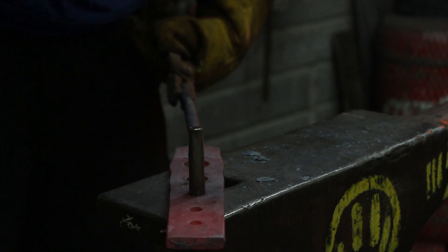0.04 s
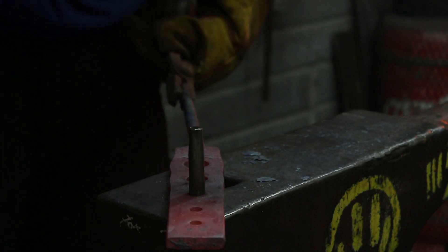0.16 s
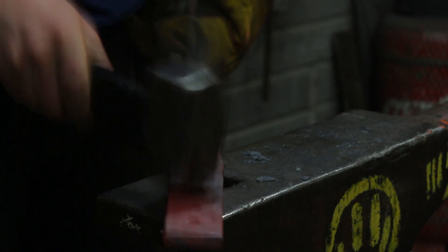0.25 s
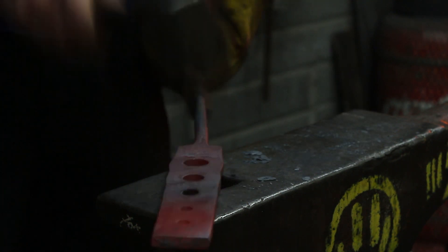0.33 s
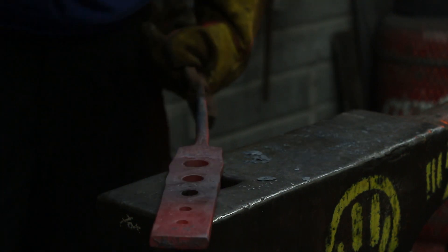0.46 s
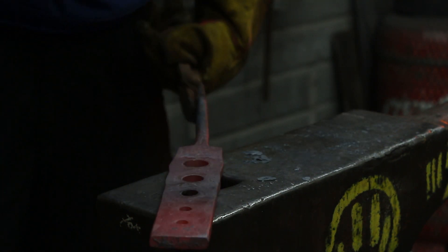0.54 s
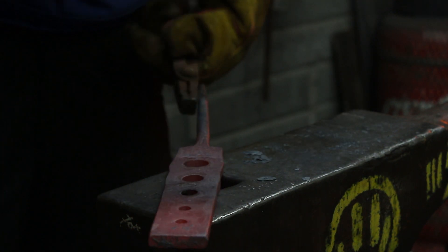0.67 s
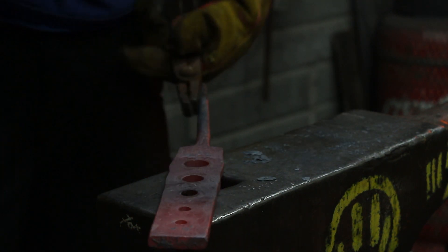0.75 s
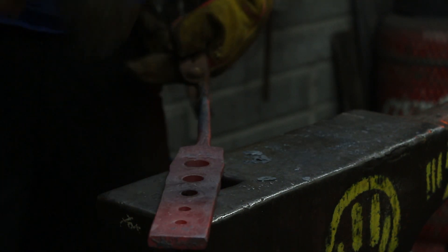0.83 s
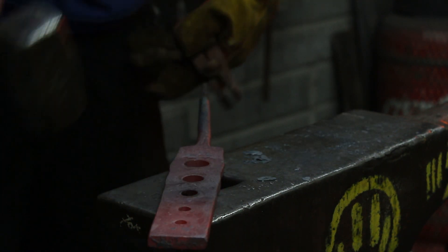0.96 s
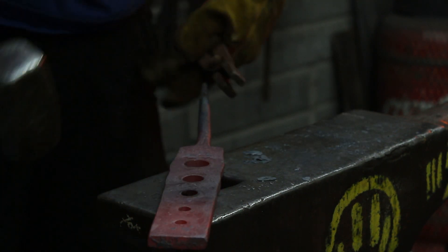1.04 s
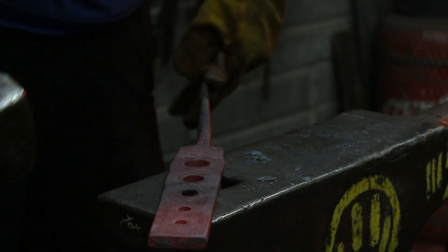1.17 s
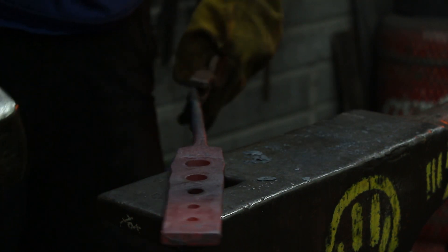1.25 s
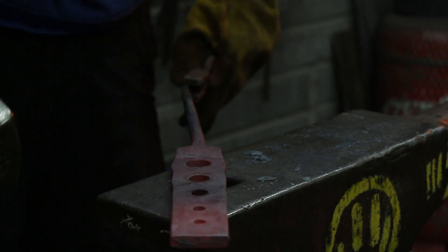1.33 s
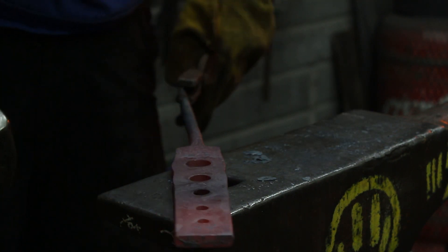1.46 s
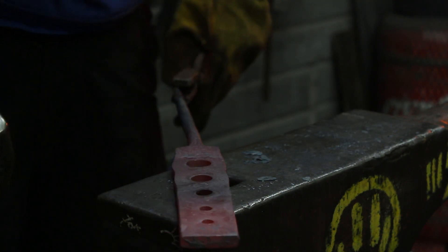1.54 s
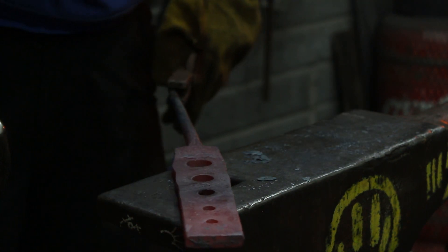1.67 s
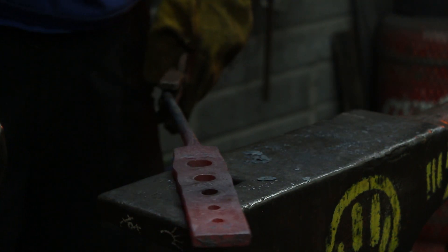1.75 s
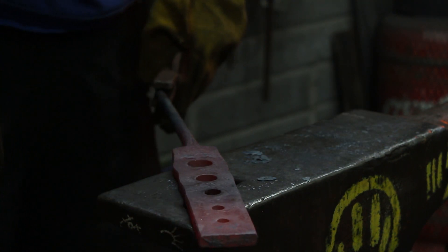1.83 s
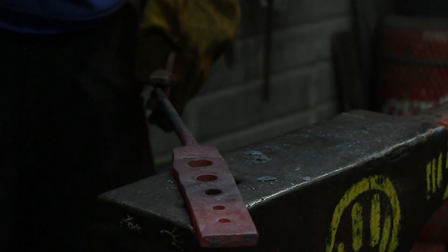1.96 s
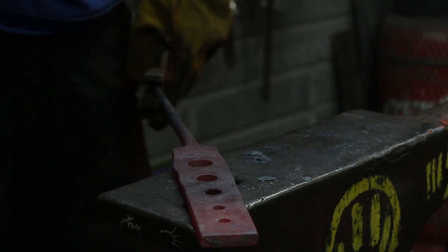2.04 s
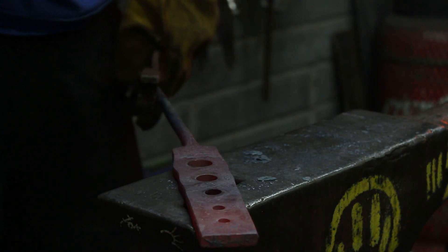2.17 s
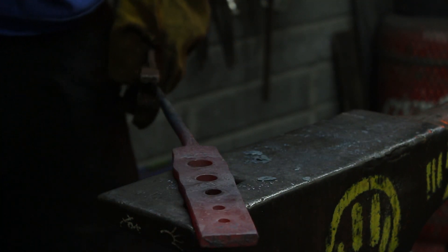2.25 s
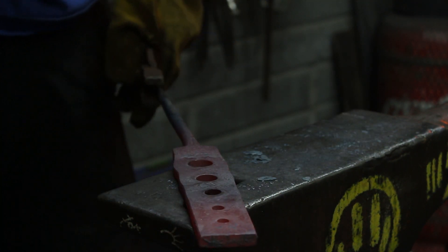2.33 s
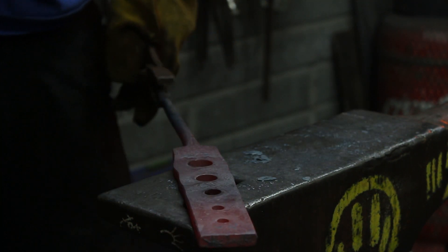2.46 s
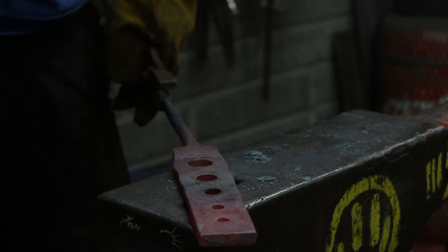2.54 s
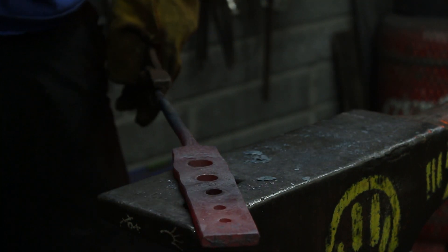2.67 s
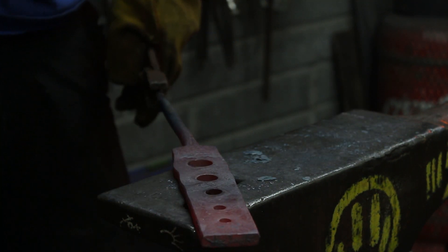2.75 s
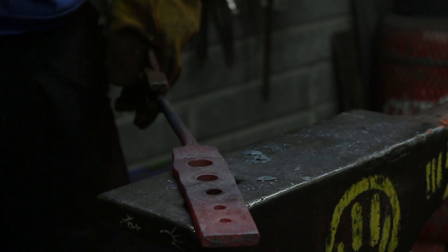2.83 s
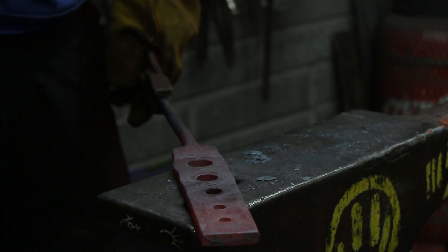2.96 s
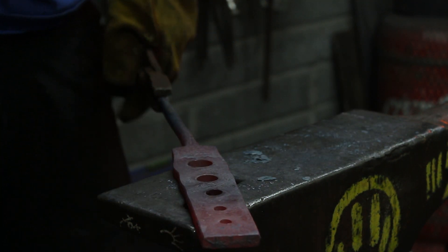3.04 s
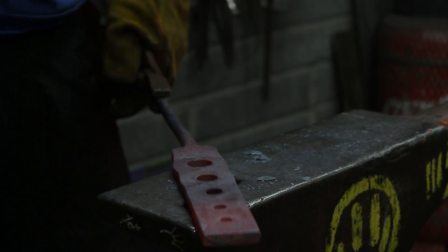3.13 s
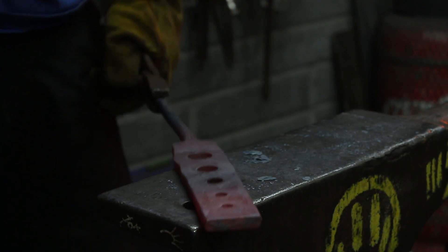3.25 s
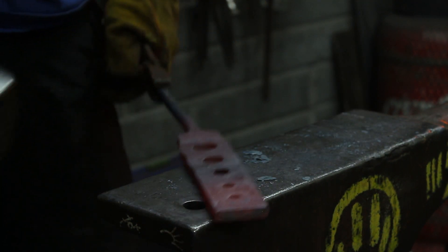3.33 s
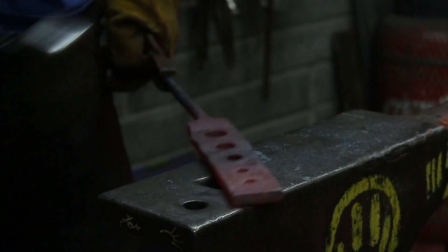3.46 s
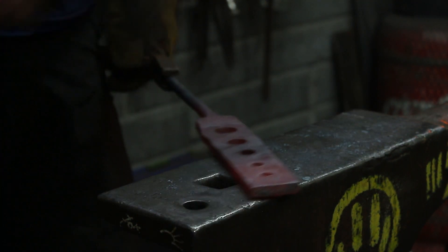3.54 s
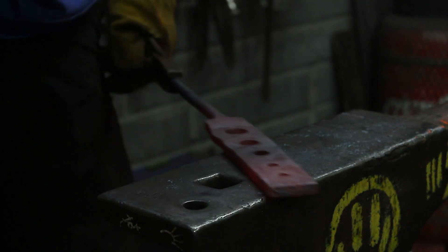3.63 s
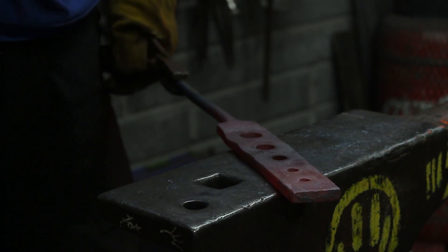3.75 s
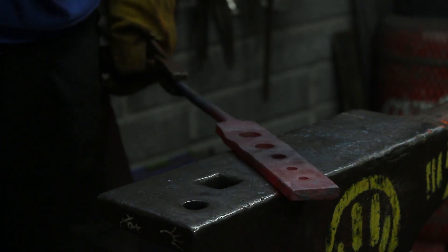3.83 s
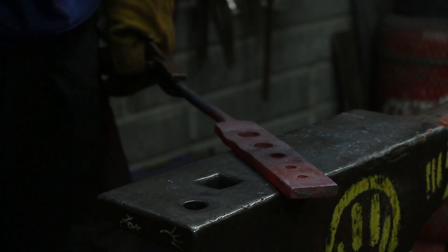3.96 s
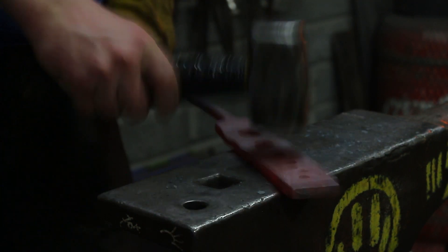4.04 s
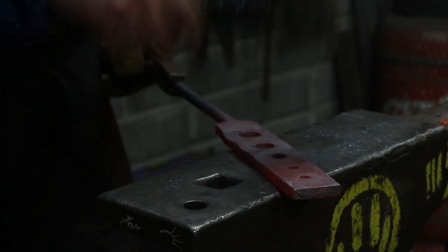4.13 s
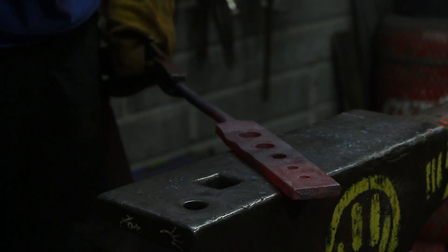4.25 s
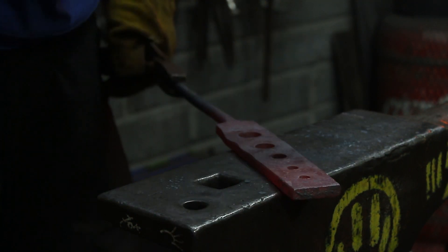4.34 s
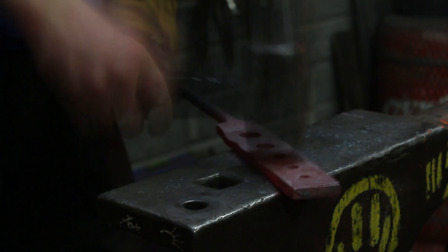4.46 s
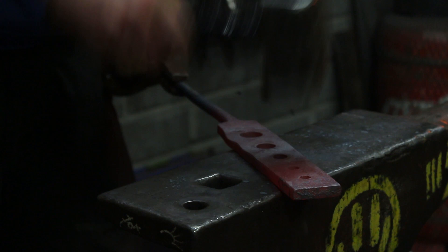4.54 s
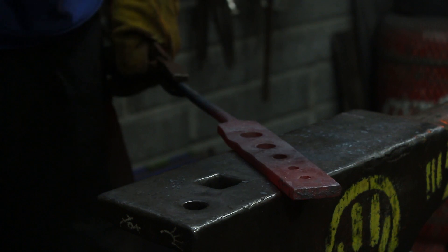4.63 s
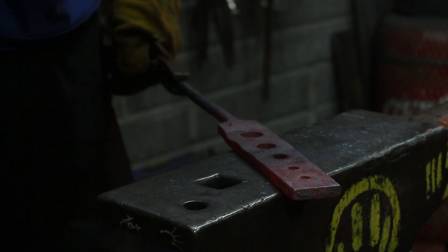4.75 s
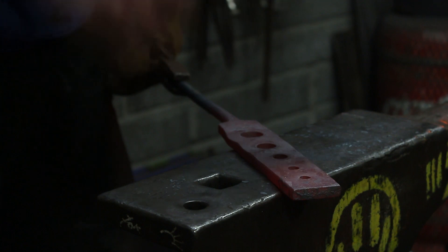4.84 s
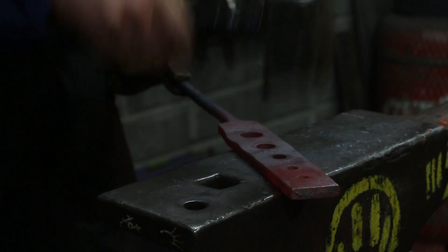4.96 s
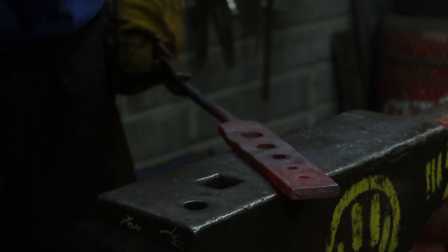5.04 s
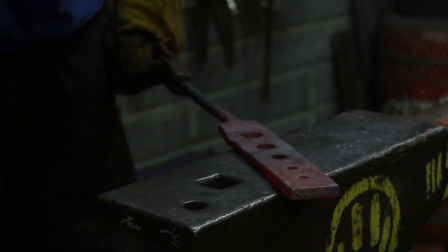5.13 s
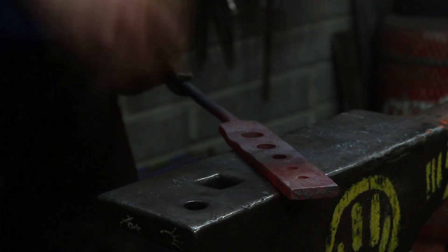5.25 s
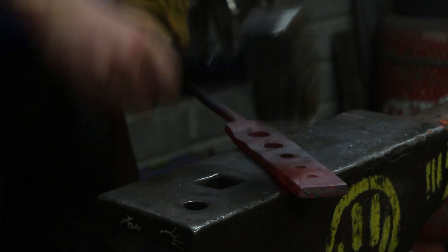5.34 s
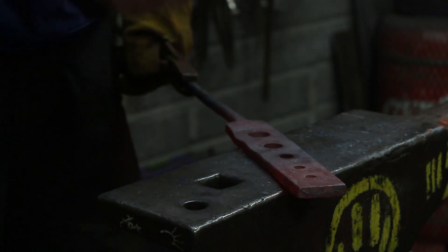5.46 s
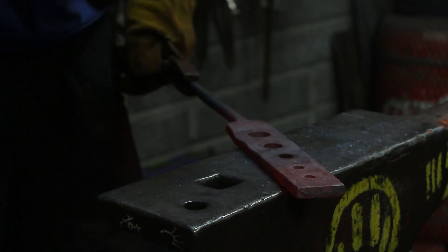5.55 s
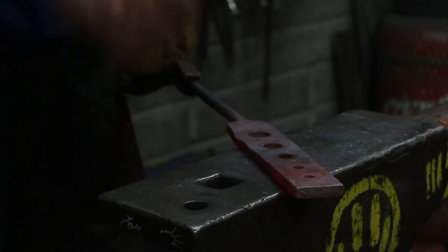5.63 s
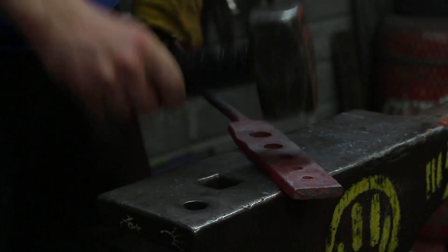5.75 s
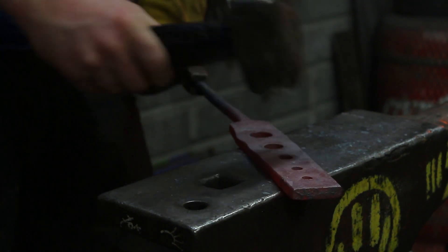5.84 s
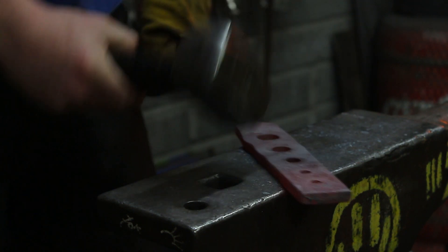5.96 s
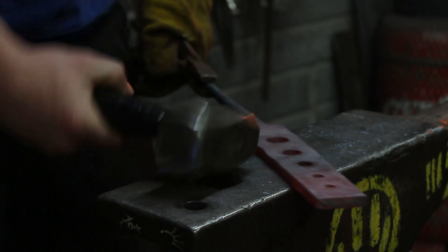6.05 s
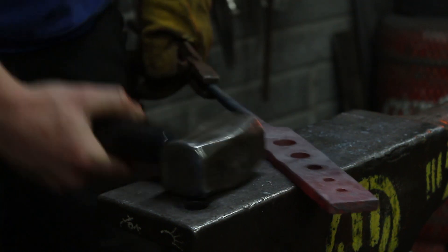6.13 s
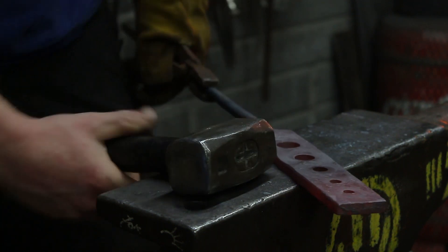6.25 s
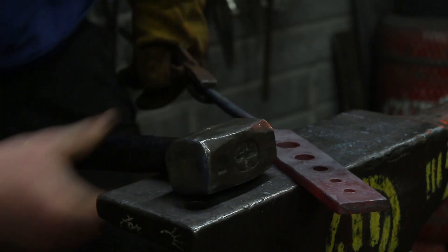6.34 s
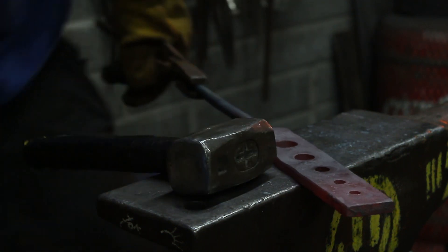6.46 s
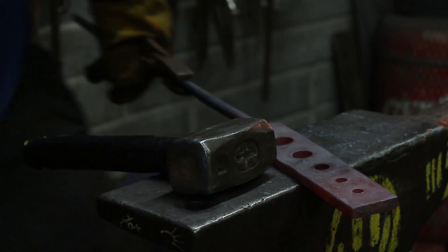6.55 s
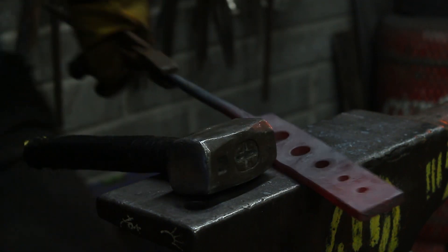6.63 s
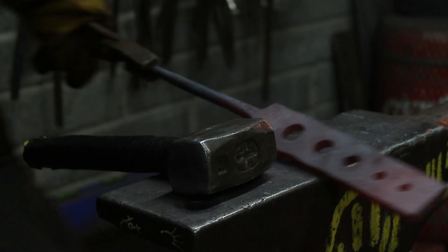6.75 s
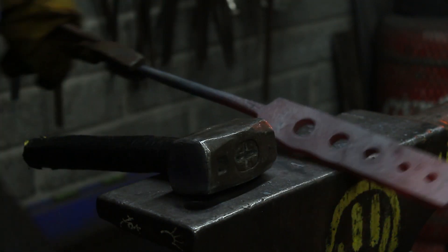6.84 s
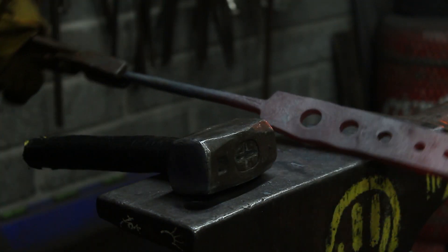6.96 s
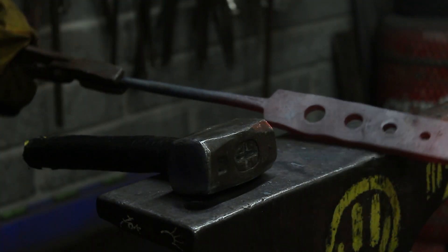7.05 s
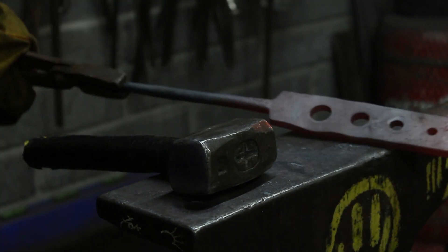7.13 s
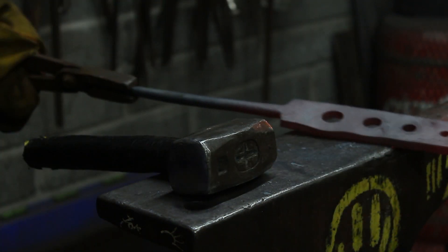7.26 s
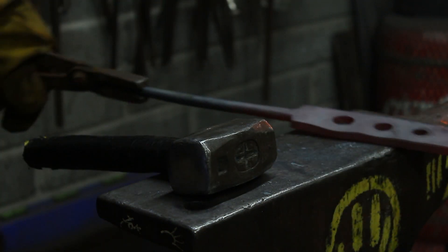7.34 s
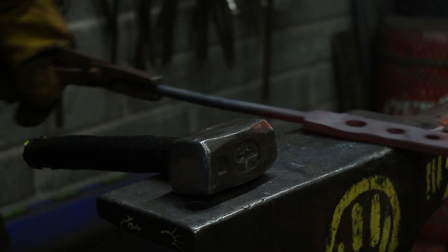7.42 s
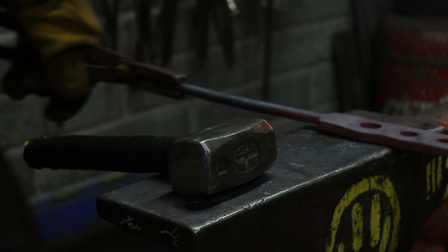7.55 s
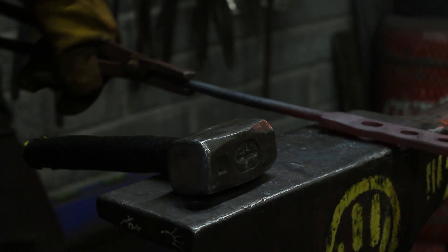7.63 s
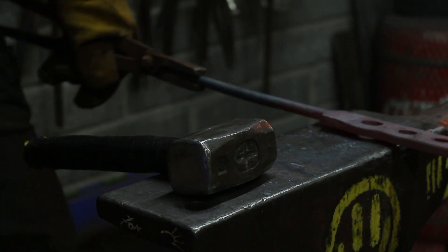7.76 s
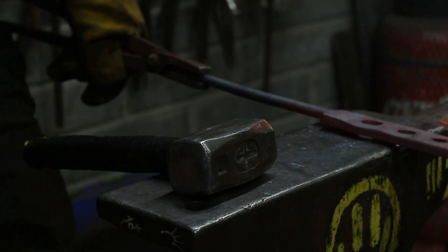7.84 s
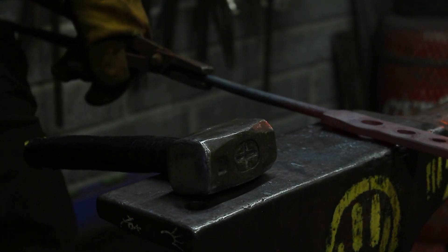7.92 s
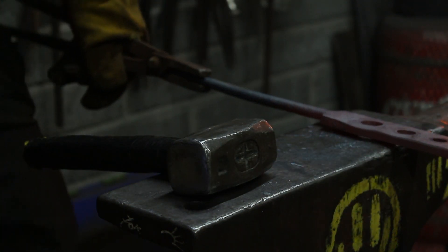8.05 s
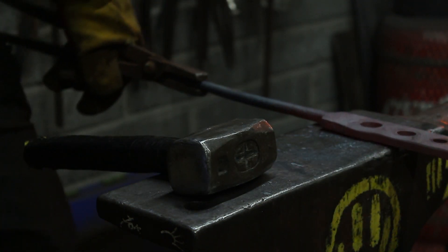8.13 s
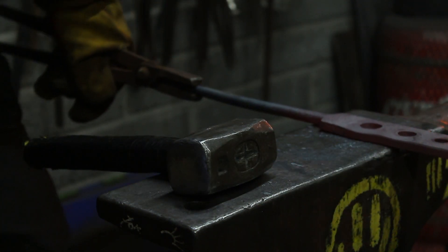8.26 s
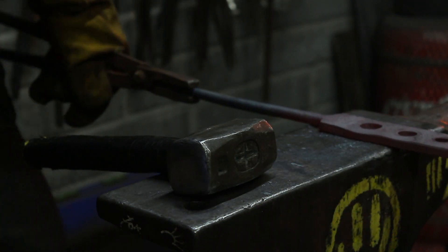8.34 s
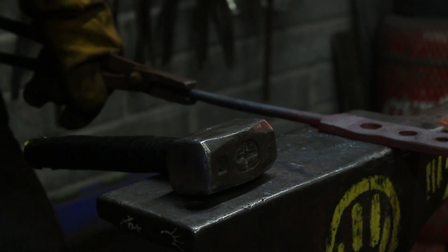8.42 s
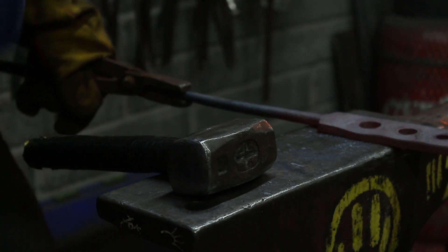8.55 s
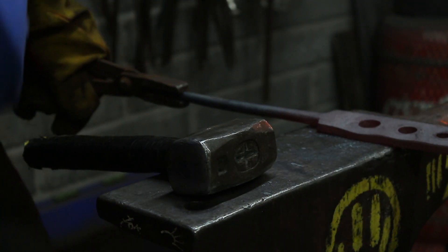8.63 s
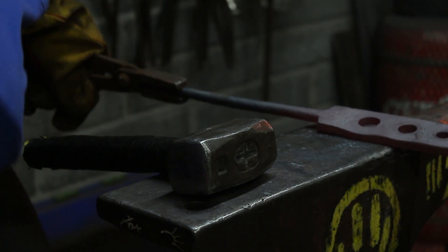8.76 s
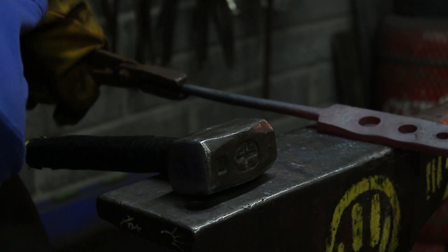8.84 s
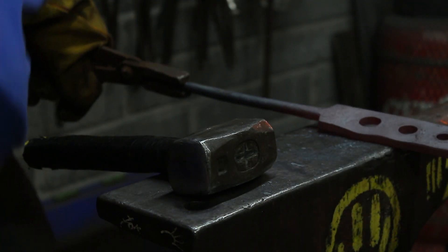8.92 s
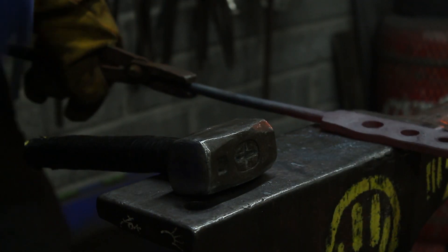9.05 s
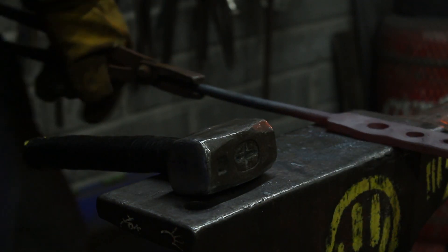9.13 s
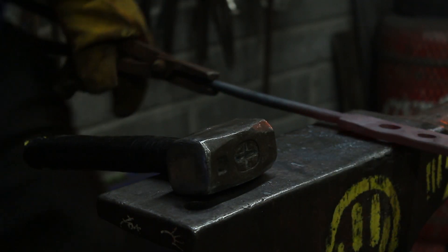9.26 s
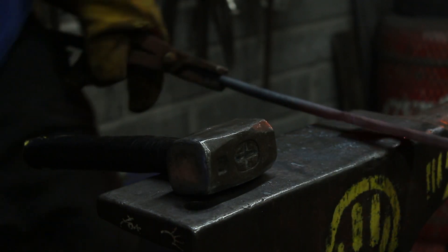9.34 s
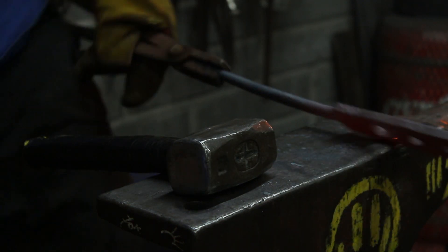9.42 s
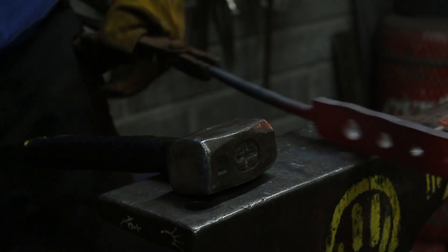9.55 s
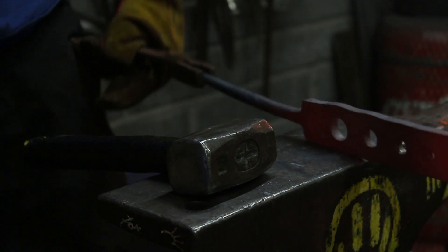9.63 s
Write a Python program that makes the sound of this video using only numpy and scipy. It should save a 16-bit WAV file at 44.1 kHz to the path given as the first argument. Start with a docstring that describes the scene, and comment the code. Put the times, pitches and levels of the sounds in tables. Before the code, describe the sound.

A gas forge roars constantly, a hollow low-mid rush around 200 to 500 hertz with soft jet hiss, in a small workshop heard by close stereo microphones. The tail of an earlier blow fades at the very start. At 0.34 s a hard double hammer blow on a steel punch cracks and overloads; the punch hits the floor at 0.58 s with a bright clang and little bounces until 0.85. Faint ticks dot 1.3 to 3.1 s, then the bar slides grittily until 3.8. Five loud, clipped anvil blows land at about 4.1, 4.6, 5.0, 5.4 and 5.8 s, each with a thump and short ring. From 6.14 to 6.35 the hammer rocks to rest in quickening, fading clinks. Soft scrapes run 6.5 to 7.6, with dull taps at 7.55. The punch is knocked sharply at 8.12, with weaker tings at 8.33 to 8.48, and a faint scrape at 9.4 s.

```python
"""A hand hammer drives a steel drift through a hot bar, flattens the bar on the anvil and is laid down to rest.
Each blow is a burst of noise with a reverberant tail, over decaying modes of the anvil and its stand.
The drift drops to the floor, rings there and is knocked about later; bar and tongs tick and slide.
A gas forge roars all the while as noise shaped by chamber resonances and jet hiss.
The stereo microphones stand close by in the shop, and their input clips at full scale."""
import sys
import numpy as np
from scipy import signal
from scipy.fft import rfft, irfft
from scipy.io import wavfile
from scipy.ndimage import uniform_filter1d

SR = 44100
rng = np.random.default_rng(int(sys.argv[2]) if len(sys.argv) > 2 else 0)


def magnitude_from_level(level_db):
    """Linear magnitude for a level in decibels (20 dB per decade)."""
    exponent = np.asarray(level_db, float) / 20
    return 10 ** exponent


def transcribe(signal):
    """Save signal, clipped to [-1, 1], as a 16-bit WAV file at the path in sys.argv[1]."""
    frames = np.atleast_2d(signal).T
    limited = np.clip(frames, -1, 1)
    pcm = np.round(limited * 32767).astype(np.int16)
    wavfile.write(sys.argv[1], SR, pcm)


N = 427329

# resonances of the forge chamber and burner: (frequency [Hz], width [Hz], level [dB])
CHAMBER_RESONANCES = [(79.8, 10.9, -17), (145.4, 14, -17.5), (216.8, 27, -6.5), (286.2, 32.9, 1),
                      (318.2, 8.2, -1.5), (434.2, 47.7, -12), (516.2, 40, -16), (633, 55, -29),
                      (748, 64, -24.5), (1085, 37, -29.5), (1379, 49, -36.5), (2100, 28, -35.5),
                      (2390, 52, -34.5), (3320, 1100, -47), (5180, 15, -34.5), (5860, 30, -40.5),
                      (6780, 70, -43.5), (8960, 550, -45), (11035, 80, -50.5)]
# gas jet hiss between the resonances: (frequency [Hz], relative density [dB per Hz])
JET_HISS = [(40, -38.5), (330, -31), (560, -3), (781, -4), (1270, -14.5), (1380, -15), (1820, -18),
            (2370, -19), (4370, -27), (8870, -25.5), (15500, -32)]
# left-right balance of the forge: (frequency [Hz], left over right [dB])
FORGE_BALANCE = [(60, 2), (180, -0.5), (550, 0.5), (1650, 0.0), (4970, -0.5), (15000, 0.5)]
FORGE_DB = -24  # rms over both channels

# likeness of the noise at the two microphones: (frequency [Hz], left-right correlation [-1 to 1])
STEREO_LIKENESS = [(60, 1), (110, 0.382), (200, 0.84), (380, 0.97), (700, 0.9), (1290, 0.9), (2380, 0.84),
                   (4400, 0.51), (8120, 0.35), (15000, 0.16)]
# colour of a contact's crack before tilt: (frequency [Hz], relative density [dB per Hz])
CRACK_COLOUR = [(120, -23.5), (200, -7.5), (2900, -7), (3290, -11), (4830, -8.5), (5190, -3), (5790, -9),
                (6340, -7.5), (15500, -14)]
# reverberation of the shop, shortened for each kind of contact: (frequency [Hz], full t60 [s])
SHOP_REVERB = [(300, 0.23), (1100, 0.26), (3000, 0.28), (7500, 0.3), (15000, 0.22)]

# faint ticks of bar and tongs: (time [s], level [dB], tilt [dB per octave])
TICKS = [(1.279, -41.5, 1), (1.328, -49.5, 1.5), (1.51, -48, .3), (2.036, -43.5, 1.9), (2.628, -47, 2.5),
         (3.074, -40.5, 2.5), (7.538, -34, -7.5), (7.5598, -36, -5.5), (7.614, -41, 0), (7.7518, -46, 0)]
# the bar slides over the anvil: (start [s], length [s], mid-slide level before grit [dB], tilt [dB per octave])
SLIDES = [(3.12, .68, -50, -0.3), (3.45, .36, -58.5, 3.5), (6.55, 0.6, -50.5, -0.2), (6.85, .48, -48, -1.1),
          (7.203, .21, -43, 4.5), (7.327, 0.14, -51, 1.4), (7.5, 0.14, -45, -4.5), (9.33, .19, -49, 1),
          (9.38, .42, -47.5, .3)]
SLIDE_END_DB = -20.5  # how far a slide has faded at its two ends

# modes of the drift (families 0, 1) and of the plate it lands on (family 2): (frequency [Hz], family [index])
DRIFT_MODES = [(5455, 0), (5545, 0), (12670, 1), (12750, 1), (12810, 1), (12865, 1), (1040, 2), (2170, 2),
               (2400, 2), (3635, 2), (4120, 2), (7130, 2)]
# ringing of those modes, t60 before any family share:
# (level [dB], t60 [s], left over right [dB], roughness [0-1])
DRIFT_RINGING = [(-8.5, 0.44, -.1, 0.1), (0, 0.13, -.1, 0.18), (-17, 0.27, -.1, .4), (-1, 0.14, -.1, 0.56),
                 (-7.5, .35, -0.089, 0.45), (-9.5, 0.32, -.1, 0.45), (-13, 0.2, -.1, 0.51),
                 (-3, 0.18, -.1, 0.56), (-0.5, 0.18, -.1, 1), (7.5, 0.066, -0.11, 0.3),
                 (-6.5, 0.17, -.1, 0.9), (-16, 0.087, -.1, .8)]
# the drift is struck, falls and bounces:
# (time [s], crack level [dB], low modes [dB], high modes [dB], plate [dB])
FALL_CONTACTS = [(0.3375, 15.5, -13, -12.5, -42.5), (0.58, -5, -13, -3.5, -17.5),
                 (0.5854, -5, -11.5, -5.5, -9.5), (0.6954, -18.5, -26, -33.5, -50.5),
                 (0.7293, -13, -32, -38, -23.5), (0.8012, -22.5, -47, -51.5, -36.5),
                 (0.841, -39, -30, -31.5, -58)]
# the drift is knocked where it lies: (time [s], crack level [dB], low modes [dB], high modes [dB])
KNOCKS = [(8.116, -13.5, -3.5, 1), (8.1225, -7, -3.5, 7), (8.333, -29, -15, -33), (8.4063, -27.5, -14, -24),
          (8.4175, -30, -9, -24), (8.4293, -32.5, -8.5, -27), (8.4754, -34, -22.5, -30)]
# ring time left to the drift while it lies down, low then high modes: (share [ratio])
LYING_SHARE = [0.81, 0.56]
# the crack is duller the more the plate outweighs the high modes: tilt [dB per octave], its growth per dB
PLATE_TILT_DB, PLATE_DULLS = -2, 0.62
# a harder knock cracks brighter: tilt [dB per octave] at 0 dB, its growth per dB
BRIGHT_DB, BRIGHT_PER_DB = 7, 0.41

# modes of anvil and hammer head: (frequency [Hz], family [index])
ANVIL_MODES = [(1340, 0), (1401, 0), (1950, 0), (2078, 0), (2885, 1), (2922, 1), (8700, 1), (4047, 4),
               (4290, 4), (5097, 2), (5123, 2), (7002, 4), (6218, 3), (13120, 3)]
# ringing of those modes, t60 before any family share:
# (level [dB], t60 [s], left over right [dB], roughness [0-1])
ANVIL_RINGING = [(-26.5, 0.087, 3.5, .6), (-25, 0.16, -1.4, .6), (6.5, 0.026, 0, .4),
                 (-7.5, 0.096, -0.5, 0), (-1.5, 0.2, -1.5, 0.3), (-11, 0.19, -6, 0.8),
                 (-20.5, 0.13, 6.2, 0.4), (-9, .2, 5, .45), (-16, 0.22, 0.5, 0.78), (-20.5, 0.21, -6.5, 0),
                 (-5.5, 0.46, -9, .08), (-12, 0.14, -1.6, 0.4), (-5, 0.22, 7, .2), (-24.5, .2, 1, .2)]
# thump of the anvil stand and floor: (frequency [Hz], family [index])
STAND_MODES = [(78, 0), (116, 0), (500, 0), (790, 0), (1240, 0)]
# ringing of those modes: (level [dB], t60 [s], left over right [dB], roughness [0-1])
STAND_RINGING = [(2.5, 0.32, -.1, .2), (3, 0.24, -0.09, 0.14), (11, 0.18, -.1, .3), (14, 0.059, -.1, 0.65),
                 (14, 0.06, -0.092, 0.82)]
# hammer blows on the drift, the last one double:
# (time [s], crack level [dB], family 0 [dB], family 2 [dB], family 3 [dB])
DRIFT_BLOWS = [(-.08, 0.0, -4, -18.5, -18), (0.337, 2, -2.5, -7.5, -14), (0.354, 4, 4, 7.5, -1)]
# hammer blows on the flat bar: (time [s], crack level [dB], family 0 [dB], family 2 [dB], family 3 [dB])
BAR_BLOWS = [(4.123, 3, -11, -3.1, 1.5), (4.57, 3.5, -5.5, 0.5, -20.5), (4.983, 4, -3, 1, -13),
             (5.392, 4.5, -3.5, 5.5, -8.5), (5.797, 2.5, -14, 9.5, -1.5)]
# the hammer is laid on the anvil and rocks to rest:
# (time [s], crack level [dB], family 0 [dB], family 1 [dB], family 3 [dB])
HAMMER_ROCKS = [(6.139, -5, -2, -16.5, -20.5), (6.19, -0.5, 1, 3.5, -17), (6.234, -9.5, -0.5, -18.5, -23.5),
                (6.246, -1, 1, -17.5, -12.5), (6.282, -13.5, -4, -18.5, -29), (6.325, -16, -9, -29, -35),
                (6.343, -24, -23, -38, -42)]
# ring time of families 0 to 4 as the hammer rests, relative to the ringing table: (share [ratio])
RESTING_SHARE = [0.59, 0.69, 0.46, 1.35, 0.75]
# families 2 and 4 follow the strength of each rock: level [dB] at 0 dB, its growth per dB
ROCK_FACE_DB, ROCK_FACE_PER_DB = -17, 0.6
# softer rocks clink duller: tilt [dB per octave] at 0 dB, its growth per dB
ROCK_TILT_DB, ROCK_TILT_PER_DB = -3, 0.3

EDGE_HZ = 15650  # upper band limit


def evened(x):
    """Scales to rms 1."""
    return x / np.sqrt(np.mean(x ** 2) + 1e-20)


def read(points, hz):
    """Reads (Hz, value) points on a log-frequency axis."""
    f, value = np.transpose(points)
    return np.interp(np.log(hz + 1), np.log(f + 1), value)


def add(mix, s, sound):
    """Mixes a stereo sound in at s seconds, cutting off what lies outside the mix."""
    at = round(s * SR)
    sound = sound[:, max(-at, 0):]
    part = mix[:, max(at, 0):][:, :sound.shape[1]]
    part += sound[:, :part.shape[1]]


def noise(shape, count, size):
    """Stereo noise from random short-time spectra; shape(Hz, s) gives dB."""
    frames = 4 * count // size + 5
    hz = np.fft.rfftfreq(size, 1 / SR)[:, None]
    a, b, c, d = rng.standard_normal((frames, len(hz), 4)).T
    likeness = np.clip(read(STEREO_LIKENESS, hz), -1, 1)
    left = a + 1j * b
    right = likeness * left + np.sqrt(1 - likeness ** 2) * (c + 1j * d)
    spectra = np.array([left, right])
    spectra *= magnitude_from_level(shape(hz, np.arange(frames) * size / 4 / SR))
    return signal.istft(spectra, nperseg=size, noverlap=3 * size // 4)[1][:, :count]


def crack(db, tilt_db, tail_db, burst_s, reverb_share=0.73):
    """The broad smack of contact: a short direct burst, then the shop's reverberation dying band by band."""
    def shape(hz, s):
        colour = read(CRACK_COLOUR, hz) + tilt_db * np.log2(hz / 4000 + 0.32)
        return colour - 60 * s / (reverb_share * read(SHOP_REVERB, hz))
    t = np.arange(SR // 3) / SR
    tail = noise(shape, count=len(t), size=256)
    tail /= np.sqrt(np.mean(tail[:, :400] ** 2))
    return magnitude_from_level(db) * tail * (magnitude_from_level(tail_db) + np.exp(-t / burst_s))


def shop_echoes(room_db):
    """Reflections as decaying noise in each channel, with one distinct return off the near wall."""
    t = np.arange(SR // 4) / SR
    echoes = rng.standard_normal((2, len(t))) * magnitude_from_level(-60 * t / 0.31)
    echoes *= magnitude_from_level(room_db) / np.linalg.norm(echoes[0])
    echoes[:, round(0.017 * SR)] += magnitude_from_level(-7.5)
    return echoes


def ring(modes, ringing, family_db, room_db, rise_s, flutter_hz, family_share=(1,) * 5,
         length_s=0.75, until_s=9.0, choke_db=(0,) * 5, lag_s=0.00003):
    """Struck modes decay as sine waves, heard directly and blurred by the shop's reflections."""
    hz, family = np.transpose(modes)[:, :, None]
    db, t60, lean_db, rough = np.transpose(ringing)[:, :, None]
    t = np.arange(round(SR * length_s)) / SR
    fading_db = 60 * t / (t60 * np.take(family_share, family))
    # the next contact chokes the ring by choke_db, over 3.7 ms
    fading_db += np.take(choke_db, family) * np.clip((t - until_s) / 0.0037, 0, 1)
    level = magnitude_from_level(np.take(family_db, family) + db - fading_db) * (1 - np.exp(-t / rise_s))

    # a rough mode stands for a crowd of close ones: its size and phase wander
    detune = rng.standard_normal((len(hz), 6, 1))
    phase = rng.random((len(hz), 6, 1))
    coarse = t[::64]
    crowd = np.exp(2j * np.pi * (flutter_hz * rough[:, None] * detune * coarse + phase))
    crowd = crowd.sum(1) / np.sqrt(6)
    wander = np.array([np.interp(t, coarse, c) for c in crowd])
    rough = np.clip(rough, 0, 1)
    level = level * (np.sqrt(1 - rough ** 2) + rough * wander)
    swing = level * np.exp(2j * np.pi * (hz * t + rng.random(hz.shape)))

    # the sound reaches the left microphone lag_s before the right
    direct = []
    for side in (1, -1):
        arrival = np.exp(1j * np.pi * hz * side * lag_s)
        direct.append((magnitude_from_level(side * lean_db / 2) * swing * arrival).imag.sum(0))
    direct = np.array(direct)
    return direct + signal.fftconvolve(direct, shop_echoes(room_db), axes=1)[:, :len(t)]


def forge():
    """Flame noise in the chamber's resonances over the hiss of the gas jet, gently unsteady."""
    def shape(hz, s):
        boom = sum(magnitude_from_level(2 * db) / (1 + (2 * (hz - f) / width) ** 2) ** 2
                   for f, width, db in CHAMBER_RESONANCES)
        hiss = magnitude_from_level(2 * (read(JET_HISS, hz) - 27.5))  # power, as is the boom
        flutter = rng.standard_normal((len(s), len(hz)))
        flutter = uniform_filter1d(uniform_filter1d(flutter, 6, 0), 12, 1)  # over time, then frequency
        return 10 * np.log10(boom + hiss) + 1.1 * evened(flutter).T
    roar = noise(shape, count=N, size=2048)
    lean = magnitude_from_level(read(FORGE_BALANCE, np.fft.rfftfreq(N, 1 / SR)) / 2)
    return magnitude_from_level(FORGE_DB) * evened(irfft(rfft(roar) * [lean, 1 / lean], N))


def ticks():
    """Small contacts of bar and tongs, each a faint crack with a short tail."""
    out = np.zeros((2, N))
    for s, db, tilt_db in TICKS:
        add(out, s, crack(db, tilt_db, tail_db=-9, burst_s=0.006, reverb_share=0.5))
    return out


def slides():
    """The scaly bar rubs over the anvil: a gritty hiss that swells and fades."""
    out = np.zeros((2, N))
    colour = [(500, -6.0), (2000, 4.0), (7000, -2.0), (15000, -5.5)]  # (Hz, dB)
    for s, length, db, tilt_db in SLIDES:
        u = np.linspace(-1, 1, round(length * SR))  # start to end of the slide
        hiss = evened(noise(lambda hz, _: read(colour, hz) + tilt_db * np.log2(hz / 4000 + 0.1),
                            count=len(u), size=256))
        grit = evened(uniform_filter1d(rng.standard_normal(len(u)), size=130))
        add(out, s, magnitude_from_level(db + SLIDE_END_DB * u ** 2) * hiss * magnitude_from_level(2.3 * grit))
    return out


def drift():
    """The loose drift rings in two close groups of bending modes; falling, it also sets a plate clanging."""
    out = np.zeros((2, N))
    for (s, db, low_db, high_db, plate_db), later in zip(FALL_CONTACTS, FALL_CONTACTS[1:] + [[N]]):
        tilt_db = PLATE_TILT_DB + PLATE_DULLS * (high_db - plate_db)
        add(out, s, crack(db, tilt_db, tail_db=-12, burst_s=0.00043, reverb_share=0.98))
        add(out, s, ring(DRIFT_MODES, DRIFT_RINGING, [low_db, high_db, plate_db], room_db=-0.5,
                         rise_s=0.0012, flutter_hz=189, family_share=[1.7, 0.95, 0.7],
                         until_s=later[0] - s, choke_db=[3, 1.5, 1.5], lag_s=0.00002))
    for (s, db, low_db, high_db), later in zip(KNOCKS, KNOCKS[1:] + [[N]]):
        tilt_db = BRIGHT_DB + BRIGHT_PER_DB * db
        add(out, s, crack(db, tilt_db, tail_db=-8.0, burst_s=0.00046, reverb_share=0.91))
        # the first six modes are the drift's own, without the plate
        add(out, s, ring(DRIFT_MODES[:6], DRIFT_RINGING[:6], [low_db, high_db], room_db=-4,
                         rise_s=0.0051, flutter_hz=86, family_share=LYING_SHARE, length_s=0.4275,
                         until_s=later[0] - s, choke_db=[10.5, 9], lag_s=0.00002))
    return out


def hammer_laid_down():
    """The hammer rocks on the anvil: clinks, most modes damped as it rests while family 3 rings on."""
    out = np.zeros((2, N))
    for (s, db, low_db, mid_db, high_db), later in zip(HAMMER_ROCKS, HAMMER_ROCKS[1:] + [[N]]):
        face_db = ROCK_FACE_DB + ROCK_FACE_PER_DB * db
        tilt_db = ROCK_TILT_DB + ROCK_TILT_PER_DB * db
        add(out, s, crack(db, tilt_db, tail_db=-21, burst_s=0.00076, reverb_share=0.97))
        add(out, s, ring(ANVIL_MODES, ANVIL_RINGING, [low_db, mid_db, face_db, high_db, face_db],
                         room_db=-5.5, rise_s=0.0009, flutter_hz=61.7, family_share=RESTING_SHARE,
                         length_s=0.375, until_s=later[0] - s, choke_db=[9.7, 14, 13, 1.5, 13]))
    return out


def hammer_blows():
    """Full blows crack on contact and shake both the anvil's modes and the stand below it."""
    out = np.zeros((2, N))
    # through the drift the stand and the anvil face (family 4) are shaken less than through the flat bar;
    # family 1 follows family 0
    for blows, thump_db, face_db, follow_db in ((DRIFT_BLOWS, -28, -8, -7.5), (BAR_BLOWS, -23, -0.6, -5.5)):
        for s, db, low_db, *family_db in blows:
            anvil_db = [low_db, low_db + follow_db, *family_db, db + face_db]
            add(out, s, crack(db, 0.0, tail_db=-3.0, burst_s=0.0015))
            add(out, s, ring(ANVIL_MODES, ANVIL_RINGING, anvil_db, room_db=-3.5,
                             rise_s=0.0052, flutter_hz=68.6))
            add(out, s, ring(STAND_MODES, STAND_RINGING, [db + thump_db], room_db=-7.5,
                             rise_s=0.004, flutter_hz=40, length_s=0.375))
    return out


def scene():
    """Everything in the shop, from the roar of the forge to the hammer."""
    return forge() + ticks() + slides() + drift() + hammer_laid_down() + hammer_blows()


def roll_off(x):
    """The treble ends steeply here."""
    return signal.sosfilt(signal.butter(12, 15610, fs=SR, output="sos"), x)


def record(dry):
    """The microphones drop the deepest bass, the input overloads hard at full scale, then the band is limited."""
    bass_cut = signal.butter(2, 35, "high", fs=SR, output="sos")
    clipped = np.clip(signal.sosfilt(bass_cut, dry), -1, 1)
    band_limit = signal.firwin(255, EDGE_HZ, window=("kaiser", 8), fs=SR)
    limited = signal.oaconvolve(clipped, band_limit[None], "same")
    return roll_off(limited)


dry = scene()
out = record(dry)
transcribe(out)
```